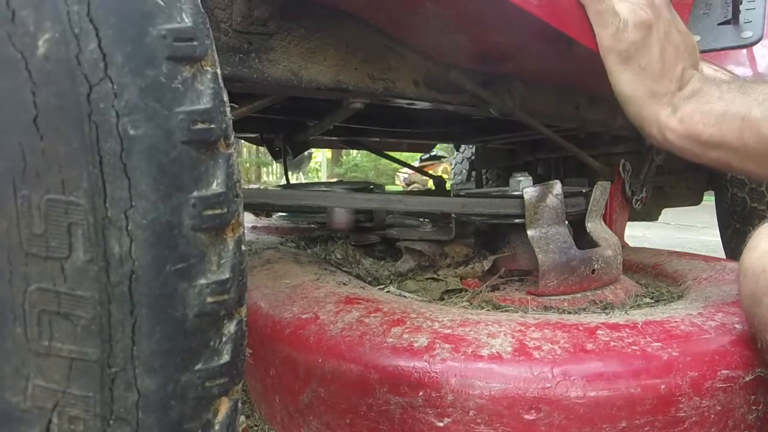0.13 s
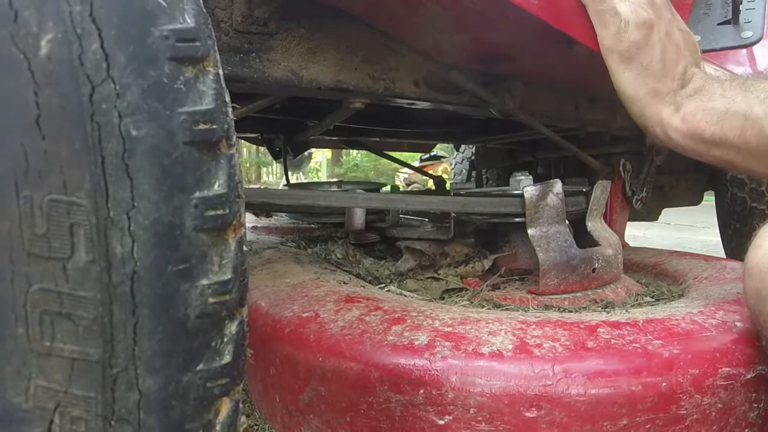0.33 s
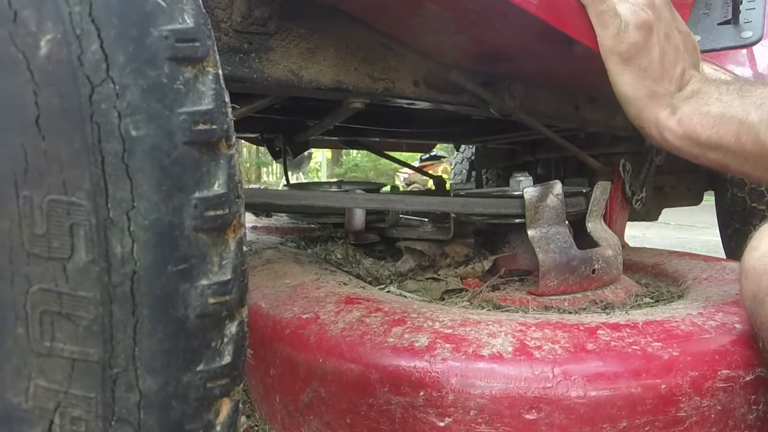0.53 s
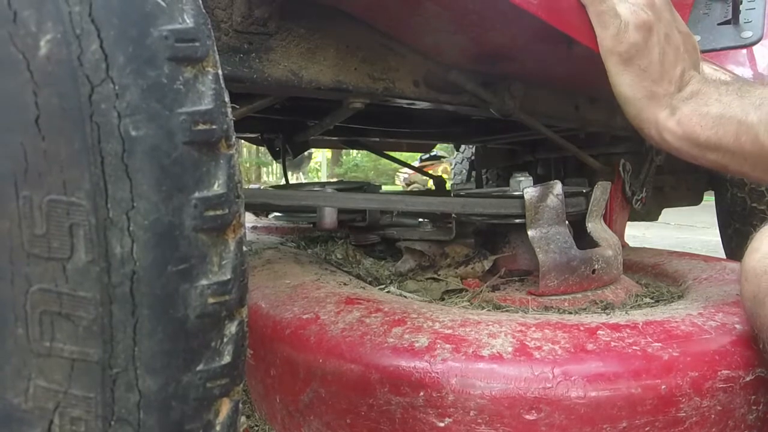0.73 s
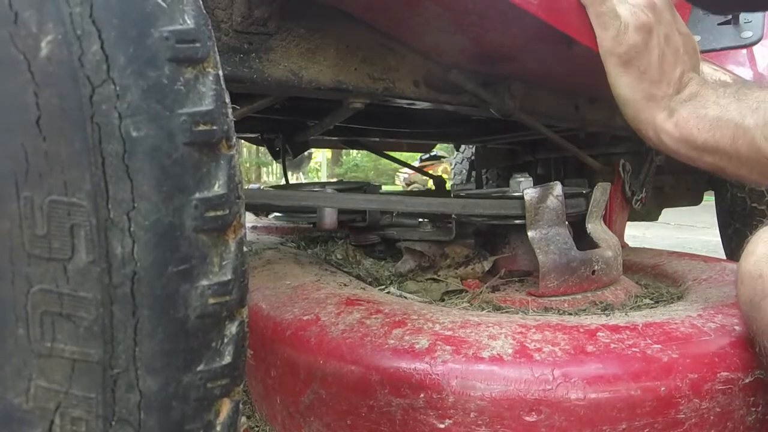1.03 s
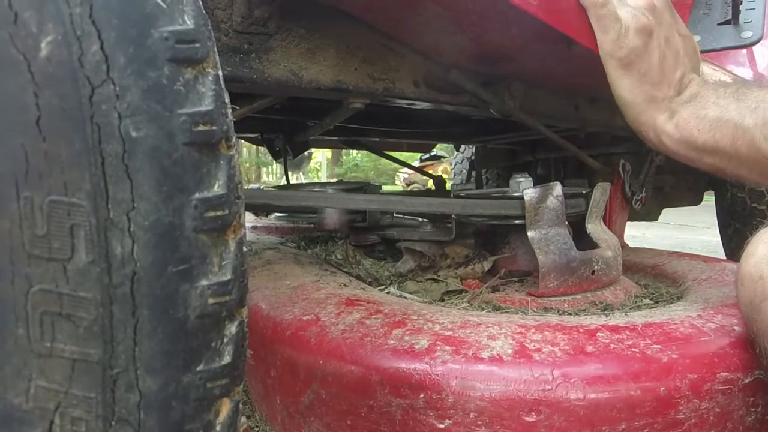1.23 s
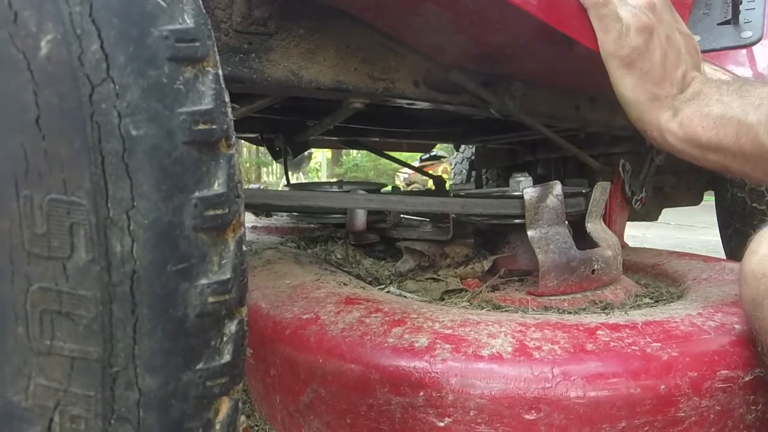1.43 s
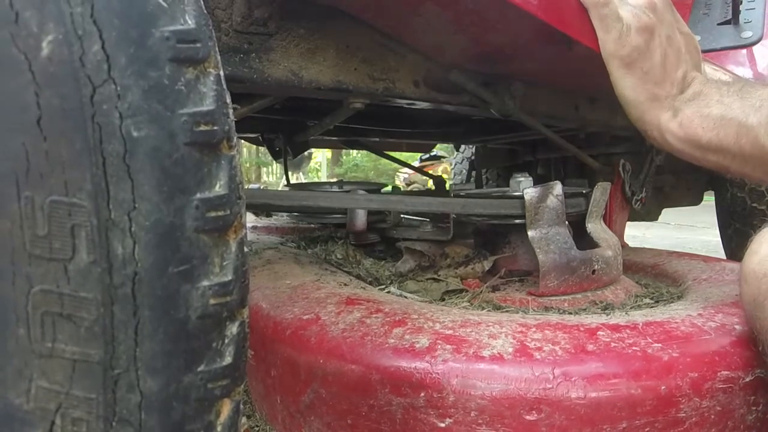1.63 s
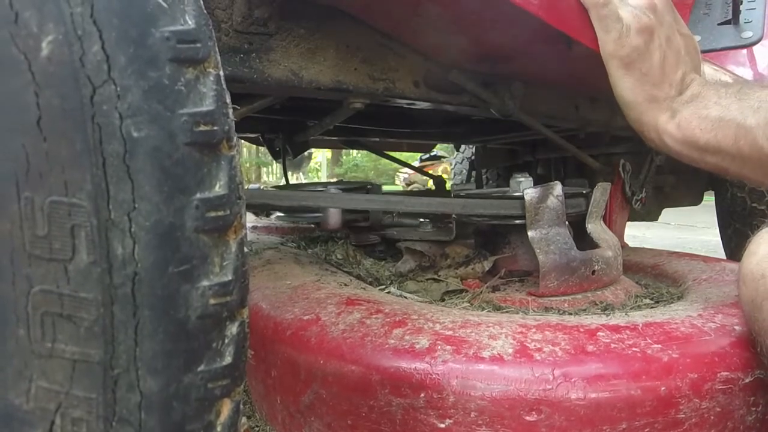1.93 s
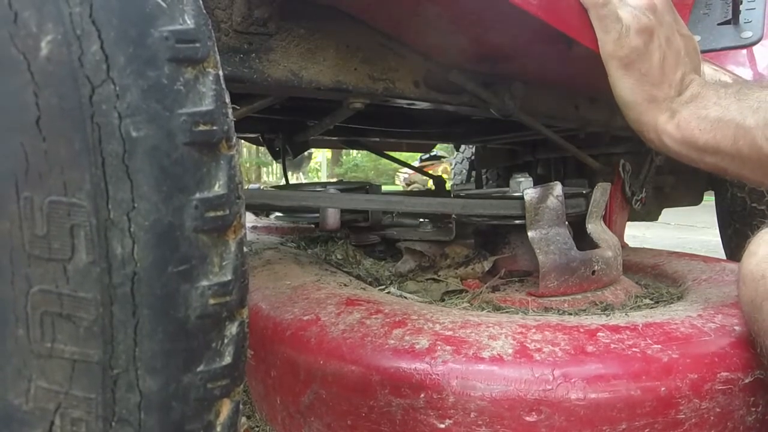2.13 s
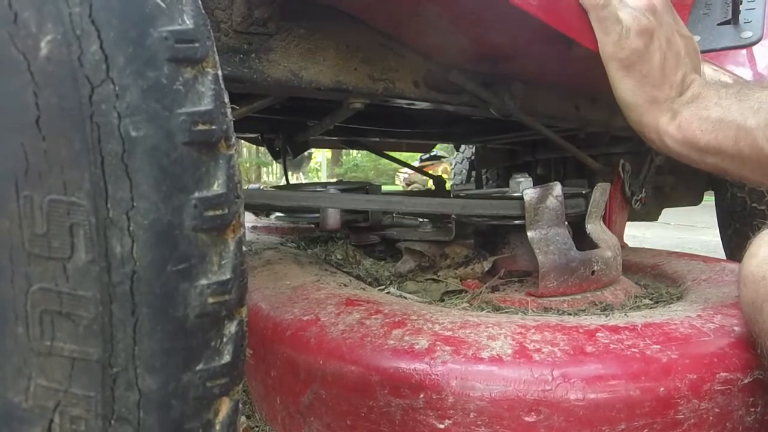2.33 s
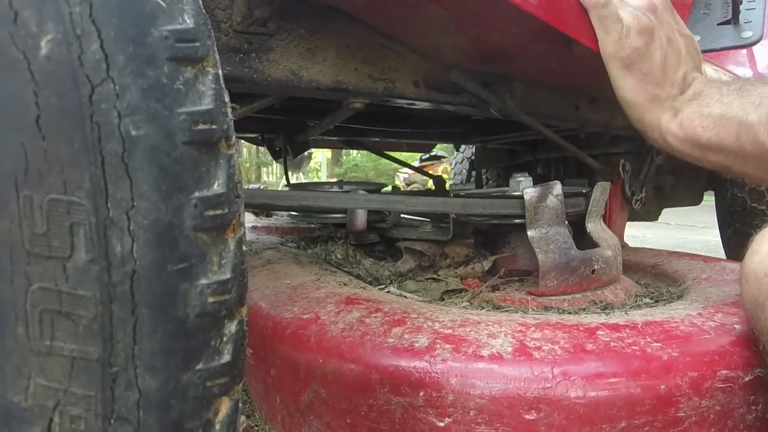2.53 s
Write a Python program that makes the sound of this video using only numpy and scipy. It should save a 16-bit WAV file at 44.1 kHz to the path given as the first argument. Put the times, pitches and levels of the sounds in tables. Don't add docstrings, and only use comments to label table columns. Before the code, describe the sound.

Close metal clanks and knocks from mower deck links worked by hand: a light rattle first, scattered ticks and thuds, a hard double clank midway, quiet rubbing, then another hard clank; faint outdoor air and engine hum.

```python
import sys
import numpy as np
from scipy import signal
from scipy.fft import rfft, irfft
from scipy.io import wavfile
from scipy.ndimage import uniform_filter1d, map_coordinates

SR = 44100
rng = np.random.default_rng(int(sys.argv[2]) if len(sys.argv) > 2 else 0)


def put_to_file(sound):
    columns = np.atleast_2d(sound).T
    safe = np.clip(columns, -1, 1)
    whole_steps = np.round(safe * 32767)
    wavfile.write(sys.argv[1], SR, whole_steps.astype(np.int16))


def linear_from_db(decibels):
    return 10 ** (np.asarray(decibels, float) / 20)


N = 119070


def unit(x):
    return x / np.sqrt(np.mean(x ** 2) + 1e-20)


def along(points, hz):
    point_hz, value = np.transpose(points)
    return np.interp(np.log(hz + 1), np.log(point_hz + 1), value)


def wobble(rate_hz):
    knots = rng.standard_normal(int(N * rate_hz / SR) + 4)
    return map_coordinates(knots, [np.arange(N) * rate_hz / SR])


def noise(tone):
    size = N + 8192
    spectrum = rfft(rng.standard_normal(size))
    spectrum = spectrum * linear_from_db(along(tone, np.fft.rfftfreq(size, 1 / SR)))
    return unit(irfft(spectrum)[:N])


def ringing(tone, t60, size):
    hz, t, cells = signal.stft(rng.standard_normal(size + 256), SR, nperseg=256)
    start_db = along(tone, hz) + rng.normal(0, 2.2, len(hz))
    fall_db = 60 * t / np.maximum(along(t60, hz), .005)[:, None]
    tail = signal.istft(cells * linear_from_db(start_db[:, None] - fall_db), SR, nperseg=256)[1][64:size + 64]
    return tail / np.linalg.norm(tail)


def add(out, start_s, x):
    part = out[int(start_s * SR):][:len(x)]
    part += x[:len(part)]


# start_s, bright_db, chatter_s, pan_db
PIN_TICKS = [(0.105, -42.5, 0.019, -46), (0.1965, -20, 0.0036, -18.5), (.209, -30, 0.015, -19),
             (.573, -54, 0.023, -56), (0.663, -40, 0.0048, -43), (0.774, -39.5, 0.023, -59),
             (0.828, -38.5, 0.0084, -73), (0.851, -48, .012, -39), (0.955, -65, 0.018, -46),
             (1.182, -32, 0.0047, -39), (1.241, -40.5, 0.032, -39.5), (1.305, -13.5, 0.005, -16),
             (1.31, -16, 0.0063, -15), (1.328, -33, 0.0081, -25.5), (1.354, -39, 0.0076, -34.5),
             (1.454, -41, 0.0091, -58), (1.466, -35, 0.008, -47), (1.821, -59, 0.0044, -51),
             (1.91, -36, 0.011, -44), (1.934, -36, 0.0059, -35), (1.944, -31, 0.012, -57),
             (1.984, -44, 0.025, -37.5), (2.057, -46, 0.0094, -41.5), (2.069, -43, 0.0098, -46),
             (2.341, -43, 0.011, -44), (2.411, -14, 0.0097, -19.5), (2.419, -12, 0.0095, -15.5),
             (2.442, -30, 0.0083, -30)]
# start_s, bright_db, chatter_s, pan_db
LINK_SLIDES = [
    (0.156, -37, 0.0096, -30),
    (.165, -28, 0.017, -25.5),
    (0.385, -31.5, 0.017, -52),
    (0.682, -31.5, 0.023, -37),
    (0.715, -48, 0.039, -42),
    (1.093, -26, 0.019, -36.5),
    (1.265, -30.5, 0.012, -27.5),
    (1.272, -25.5, 0.04, -21.5),
    (2.375, -28, 0.036, -27.5),
    (2.393, -28, 0.013, -24),
]
# pitch_hz, level_db, t60_s (time to fall 60 dB)
PAN_NOTES = [(231, -5.5, 0.45), (307, -5.5, 0.37), (413, -6.5, 0.054), (469, -3.5, 0.28), (508, -3.5, 0.38),
             (571, -8, 0.049), (724, -14.5, 0.28), (777, -16, 0.46), (976.5, -7.5, 0.17),
             (1117, -11.5, 0.19), (1251, -15, 0.16), (1640, -23.5, 0.17), (1838, -10.5, 0.16),
             (2790, -28, 0.11)]
# pitch_hz, level_db (per Hz)
PAN_TONE = [(100, -51), (230, 0), (450, 2.5), (1000, -12), (2000, -16), (4000, -22.5), (9000, -44.5)]
# pitch_hz, t60_s
PAN_RING = [(200, 0.24), (600, 0.17), (1500, 0.2), (3500, 0.085), (8000, 0.1)]
# pitch_hz, level_db (per Hz)
STEEL_TONE = [(900, -1.5), (2000, -9.5), (4300, -7.5), (10000, -12), (13000, -29.5), (15200, -16.5)]
# pitch_hz, t60_s
STEEL_RING = [(2000, 0.084), (6000, 0.038), (14000, 0.026)]


def chatter(chatter_s, fade):
    t = np.arange(SR // 16) / SR
    progress = t / np.clip(chatter_s, .001, .05)
    grains = np.repeat(rng.standard_normal(len(t) // 24 + 1), 24)[:len(t)]
    knocks = rng.standard_normal(len(t)) * unit(linear_from_db(6.5 * grains))
    onset = 1 - np.exp(-t / 0.00057)
    return knocks * onset * np.exp(-fade * progress) / (1 + progress ** 8)


def links():
    out, t = np.zeros(N), np.arange(SR // 2) / SR
    hz, db, t60 = np.transpose(PAN_NOTES)[..., None]
    pan_notes = linear_from_db(db - 60 * t / t60) * np.sin(2 * np.pi * hz * t)
    contacts = [(row, 1.5) for row in PIN_TICKS]
    contacts += [(row, 0.54) for row in LINK_SLIDES]
    for (start_s, bright_db, chatter_s, pan_db), fade in contacts:
        blows = chatter(chatter_s, fade)
        notes = linear_from_db(rng.normal(0, 1.86, len(PAN_NOTES))) @ pan_notes
        pan = ringing(PAN_TONE, PAN_RING, size=len(t)) + linear_from_db(-2.5) * notes / np.linalg.norm(notes)
        steel = signal.fftconvolve(blows, ringing(STEEL_TONE, STEEL_RING, size=SR // 10))
        body = signal.fftconvolve(blows, pan)
        steel_peak = np.sqrt(uniform_filter1d(steel ** 2, 200).max())
        body_peak = np.sqrt(uniform_filter1d(body ** 2, 400).max())
        add(out, start_s, linear_from_db(bright_db - 8) * steel / steel_peak)
        add(out, start_s, linear_from_db(pan_db - 1) * body / body_peak)
    return out


# start_s, peak_db, pitch_hz, t60_s, hanger_db
PAN_THUDS = [(0.065, -33.5, 214, 0.081, -39), (0.159, -27, 432, .1, -27.5), (0.217, -24, 231, 0.13, -48),
             (0.304, -19.5, 207, 0.09, -26), (0.319, -27.5, 225, 0.044, -37), (0.371, -28, 213, 0.092, -28),
             (0.395, -19.5, 208.6, 0.11, -26), (0.441, -28.5, 213, 0.31, -58),
             (0.675, -28, 225, 0.092, -55), (0.804, -14, 222, 0.049, -32), (.842, -24, 191, 0.13, -20),
             (0.864, -26.5, 254, 0.1, -53), (.955, -26, 246, .05, -40), (0.966, -24, 178, 0.066, -30.5),
             (.982, -27.5, 272, .1, -51), (1.096, -16, 303.5, 0.099, -21), (1.113, -18, 294.5, .11, -30),
             (1.177, -27.5, 286.5, 0.17, -30), (1.247, -23, 249, 0.057, -34),
             (1.293, -15.5, 290, 0.072, -29.5), (1.306, -12, 656, 0.043, -49),
             (1.3168, -5.5, 418.5, 0.041, -40), (1.336, -19.5, 450, 0.093, -43),
             (1.369, -34, 293, 0.036, -38), (1.391, -25, 235, 0.038, -39), (1.412, -17.5, 206, 0.058, -36),
             (1.478, -26.5, 196, 0.077, -28.5), (1.512, -30.5, 196, .07, -46),
             (1.882, -19.5, 299, 0.08, -39), (1.911, -28, 299, 0.16, -52), (1.954, -26, 298, 0.18, -63),
             (1.985, -33, 331, 0.046, -55), (2.063, -34.5, 443, 0.13, -63), (2.083, -40, 460, 0.12, -60),
             (2.386, -26, 307, 0.12, -37), (2.4125, -8.5, 398, 0.091, -52), (2.426, -9.5, 381, 0.072, -46),
             (2.436, -12.5, 435, 0.056, -48), (2.453, -21, 440, 0.12, -45), (2.479, -20, 229, 0.14, -25.5)]
# pitch_hz, level_db (per Hz)
HOLLOW_TONE = [(70, -31), (130, -13.5), (260, 1), (450, -8.5), (900, -30.5), (2000, -58)]
# pitch_hz, t60_s
HOLLOW_RING = [(200, 0.33)]


def thuds():
    out, t = np.zeros(N), np.arange(SR // 2) / SR
    sag, sag_s = 0.14, 0.0078
    hanger_hz, hanger_t60_s = 125.7, 0.14
    for start_s, peak_db, hz, t60_s, hanger_db in PAN_THUDS:
        ratio, phase, hanger_tune = rng.uniform([.6, 0, .9], [.8, 2 * np.pi, 1.15])
        drift = uniform_filter1d(np.cumsum(rng.normal(0, 0.01, len(t))), 150)
        drift = drift - 2 * np.pi * hz * sag * sag_s * np.expm1(-t / sag_s)
        pair = np.sin(2 * np.pi * hz * t + drift)
        pair = pair + 0.31 * np.sin(2 * np.pi * hz * ratio * t + phase)
        boom = ringing(HOLLOW_TONE, HOLLOW_RING, size=len(t))
        bump = linear_from_db(-60 * t / t60_s) * pair + linear_from_db(-11) * boom / np.abs(boom).max()
        add(out, start_s, linear_from_db(peak_db + 0.5) * (1 - np.exp(-t / 0.0026)) * bump)
        hanger = np.sin(2 * np.pi * hanger_hz * hanger_tune * t) * (1 - np.exp(-t / 0.0029))
        add(out, start_s, linear_from_db(hanger_db - 60 * t / hanger_t60_s) * hanger)
    return out


# start_s,
# pitch_hz, level_db, t60_s
PART_PINGS = [(.198, 9700, -40, .12), (.198, 4150, -31, .03), (.215, 229, -29, .7), (.22, 1050, -42, .3),
              (.25, 2900, -54, .15), (.384, 7300, -35, .08), (.386, 11200, -43, .04),
              (.403, 10700, -50, .1), (.405, 4950, -50, .05), (.81, 145, -26, .3), (.835, 5330, -60, .1),
              (.853, 1650, -46, .3), (.956, 3190, -52, .05), (1.095, 5600, -35, .065),
              (1.097, 2320, -40, .09), (1.106, 8450, -42, .056), (1.108, 14000, -55, .08),
              (1.185, 1740, -39, .04), (1.186, 3300, -43, .04), (1.186, 7000, -46, .04),
              (1.279, 7460, -42, .12), (1.306, 1780, -23, .04), (1.33, 1830, -36, .2),
              (1.33, 516, -29, .45), (1.34, 2789, -44, .4), (1.33, 3220, -55, .9), (1.39, 229, -34, .6),
              (1.466, 7110, -42, .04), (1.468, 10800, -47, .04), (1.468, 3150, -46, .03),
              (1.832, 1150, -48, .06), (1.911, 6500, -46, .03), (1.945, 11300, -46, .03),
              (1.945, 10100, -47, .03), (1.945, 1750, -46, .05), (1.95, 8900, -57, .1),
              (2.0, 2210, -48, .05), (2.072, 12200, -52, .04), (2.382, 7320, -42, .09),
              (2.417, 4150, -30, .05), (2.42, 1846, -31, .08), (2.425, 3230, -54, 1.3),
              (2.426, 4670, -60, .9), (2.43, 423, -24, .25), (2.44, 231, -28, .3)]


def pings():
    out, t = np.zeros(N), np.arange(SR // 2) / SR
    for start_s, hz, level_db, t60_s in PART_PINGS:
        rough = np.cumsum(rng.normal(0, 1, len(t)) * hz * 1.1e-5)
        flutter_db = 2.5 * wobble(50)[:len(t)]
        envelope = linear_from_db(level_db - 60 * t / t60_s + flutter_db) * (1 - np.exp(-t / 0.0011))
        add(out, start_s, envelope * np.sin(2 * np.pi * hz * t + rough))
    return out


# start_s, firmest_s, end_s, level_db
DRAG_STROKES = [
    (.2, 0.268, 0.48, -42),
    (0.568, 0.577, 0.72, -39.5),
    (0.618, 0.724, 0.96, -35.5),
    (0.914, 0.963, 1.13, -43.5),
    (1.34, 1.38, 1.59, -38.5),
    (1.81, 1.822, 1.93, -39),
    (1.838, 1.96, 2.117, -34),
    (2.43, 2.467, 2.704, -37),
]
# pitch_hz, level_db (per Hz)
DRAG_TONE = [(60, -44), (130, -2), (400, 2.5), (900, -11.5), (2200, -23), (3500, -27), (5500, -38.5),
             (14000, -65)]


def drag():
    t, ring_t = np.arange(N) / SR, np.arange(SR // 4) / SR
    press = np.zeros(N)
    for start_s, firmest_s, end_s, level_db in DRAG_STROKES:
        swell = np.interp(t, [start_s, firmest_s], [0, 1]) ** 1.32
        ease_db = 19 * np.maximum(t - firmest_s, 0) / (end_s - firmest_s)
        press += swell * linear_from_db(level_db - ease_db)
    hiss = unit(linear_from_db(1.2 * wobble(35) + 3 * wobble(250)) * noise(DRAG_TONE))
    grit = press * unit(linear_from_db(6.5 * wobble(300)) * rng.standard_normal(N))
    pan = np.zeros(len(ring_t))
    for hz, db, t60_s in PAN_NOTES:
        pan += linear_from_db(db - 60 * ring_t / (0.66 * t60_s)) * np.sin(2 * np.pi * hz * ring_t)
    rung = signal.fftconvolve(grit, pan / np.linalg.norm(pan))[:N]
    return press * hiss + linear_from_db(-8.5) * rung


# pitch_hz, level_db
ENGINE_HUM = [(37.7, -76), (107.7, -54.5), (157, -51), (538, -62), (635, -67), (1100, -71.5), (3230, -80)]


def engine():
    hum = np.zeros(N)
    for hz, level_db in ENGINE_HUM:
        level = linear_from_db(level_db + 1.5 * wobble(13)) * np.sqrt(2)
        wavering_hz = hz + 2 * wobble(14.94)
        hum += level * np.sin(2 * np.pi * np.cumsum(wavering_hz) / SR)
    return hum


# pitch_hz, level_db (per Hz)
AIR_TONE = [(20, -7), (40, -4), (160, -4), (350, -12.5), (800, -23), (4000, -36.5), (12000, -49),
            (15600, -64)]


def outdoor_air():
    return linear_from_db(-46.5 + 0.97 * wobble(4.76)) * noise(AIR_TONE)


def scene():
    no_bass = signal.butter(4, 77.6, "high", fs=SR, output="sos")
    steel = signal.sosfilt(no_bass, links() + thuds())
    return (steel + pings() + drag() + engine() + outdoor_air())[None]


def roll_off(x):
    return signal.sosfilt(signal.butter(12, 15760, fs=SR, output="sos"), x)


def record(dry):
    treble_limit = signal.cheby2(10, 60, 15850, fs=SR, output="sos")
    return roll_off(signal.sosfilt(treble_limit, dry))


dry = scene()
out = record(dry)
put_to_file(out)
```